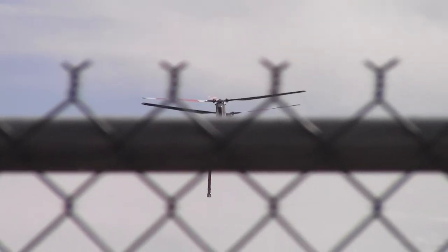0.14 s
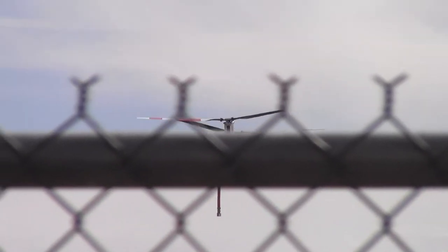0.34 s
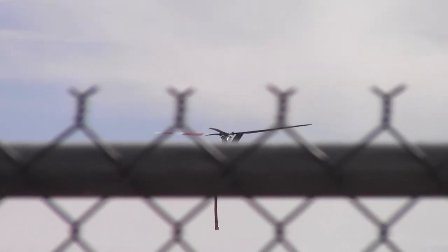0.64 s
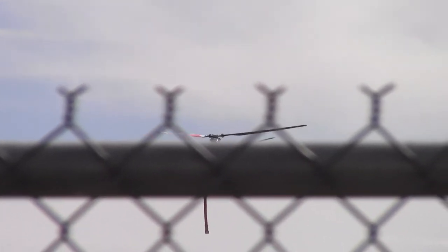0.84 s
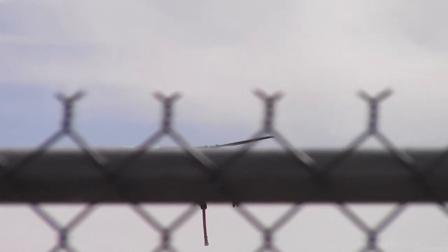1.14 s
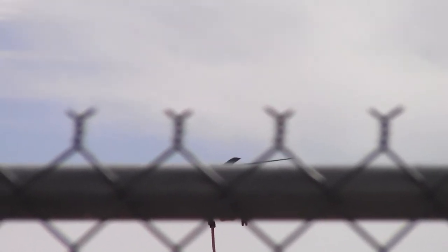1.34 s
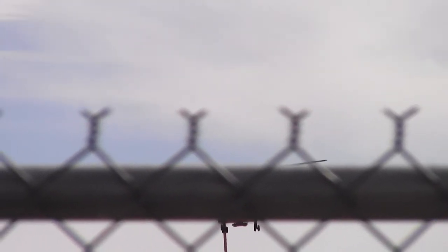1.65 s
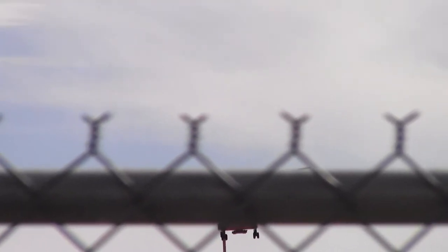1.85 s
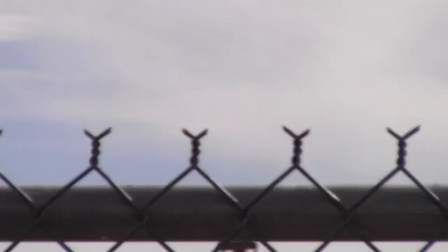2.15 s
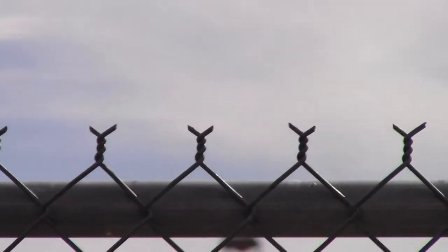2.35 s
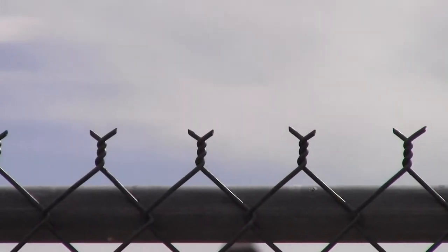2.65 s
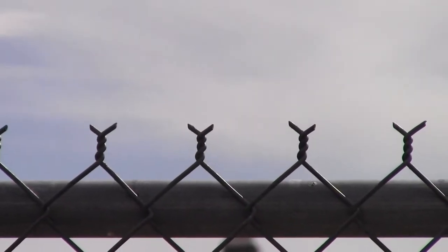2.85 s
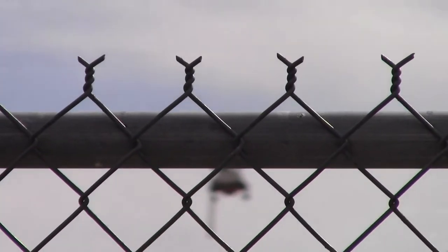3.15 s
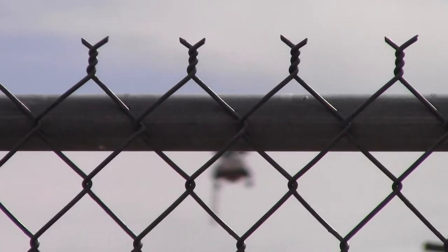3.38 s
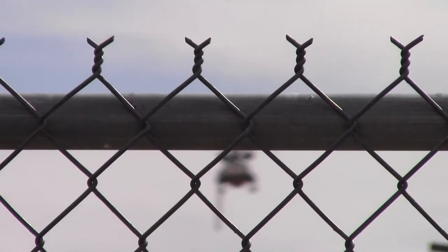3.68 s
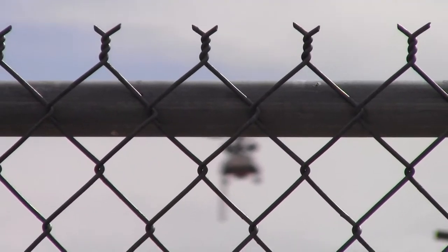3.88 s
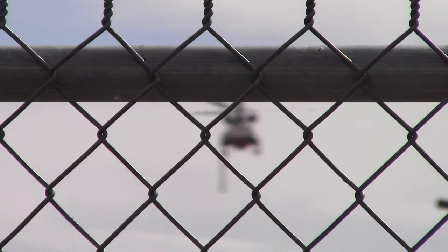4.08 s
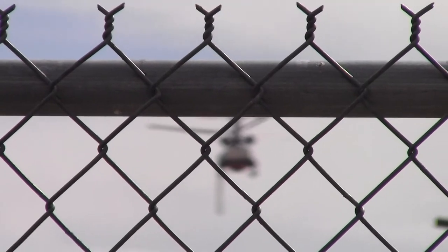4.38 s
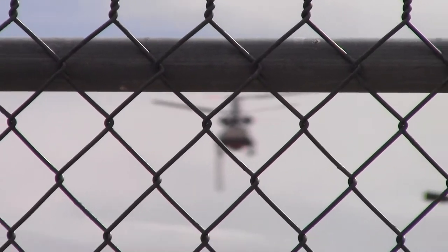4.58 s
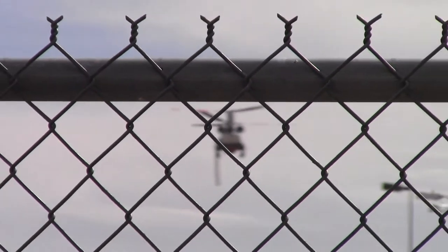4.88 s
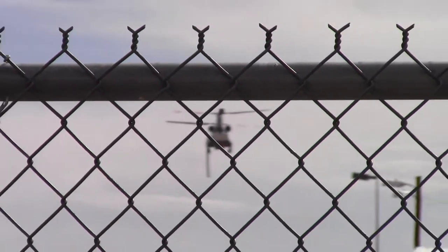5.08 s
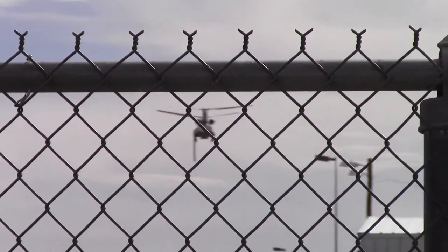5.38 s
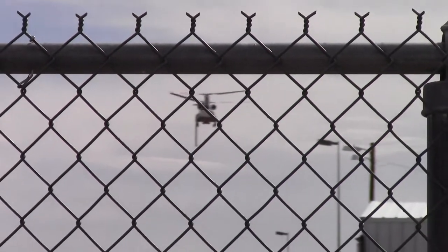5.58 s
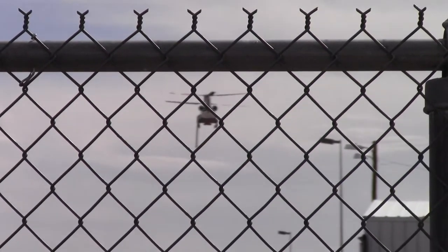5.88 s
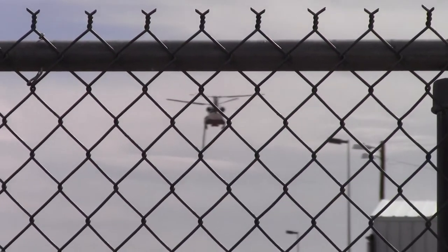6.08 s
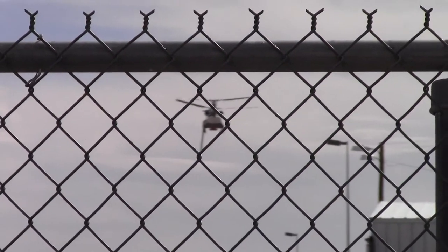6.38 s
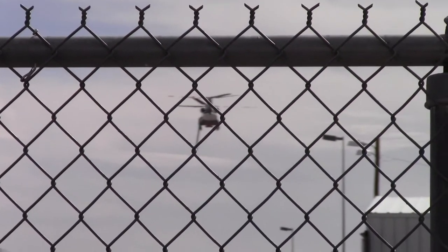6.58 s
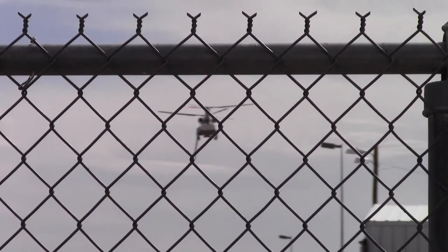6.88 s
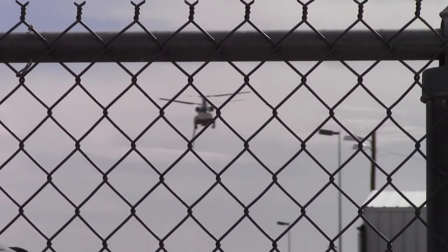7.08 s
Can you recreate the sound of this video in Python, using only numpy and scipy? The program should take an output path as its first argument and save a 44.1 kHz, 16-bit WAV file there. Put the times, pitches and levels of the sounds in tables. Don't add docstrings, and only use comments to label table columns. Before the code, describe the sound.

Distant twin-rotor helicopter hovers with a quick, dull, uneven blade slapping over a low turbine roar; wind puffs and one plastic click come late.

```python
import sys
import numpy as np
from scipy import signal
from scipy.fft import rfft, irfft, next_fast_len
from scipy.io import wavfile
from scipy.ndimage import uniform_filter1d, map_coordinates

SR = 44100
rng = np.random.default_rng(int(sys.argv[2]) if len(sys.argv) > 2 else 0)


def ratio(d):
    e = np.asarray(d, float) / 20
    return 10 ** e


def persist_wave(psi):
    counts = np.round(np.clip(psi, -1, 1) * 32767).astype(np.int16)
    wavfile.write(sys.argv[1], SR, np.atleast_2d(counts).T)


N = 318826

CLEARNESS_SHARE = (0.063, 0.46, 1.1)
OPPOSITE = np.array([[1], [-1]])


def unit(x):
    return x / np.sqrt(np.mean(x ** 2) + 1e-20)


def wobble(rate):
    knots = rng.standard_normal(int(N * rate / SR) + 4)
    return map_coordinates(knots, [np.arange(N) * rate / SR])


def coloured(x, points):
    size = next_fast_len(N + 8192)
    hz, db = np.transpose(points)
    bins_hz = np.fft.rfftfreq(size, 1 / SR)
    gain = ratio(np.interp(np.log(bins_hz + 1), np.log(hz + 1), db))
    return irfft(rfft(x, size) * gain, size)[..., :N]


def noise(points, even=0.):
    x = unit(coloured(rng.standard_normal(N), points))
    power = uniform_filter1d(uniform_filter1d(x * x, size=900), size=900)
    swell = np.abs(power) + 0.38
    return unit(x * swell ** (-np.clip(even, 0, 1) / 2))


def helicopter():
    # (frequency [Hz], level [dB per Hz])
    thud_colour = [(20, -53.5), (60, -27.5), (95, -6), (120, -4.5), (196, 2), (294, -3), (400, -15),
                   (450, -21), (520, -86.5), (900, -140)]
    knock_colour = [(380, -43), (470, -10.5), (540, 1.5), (610, -10), (757, -14), (834, -15), (900, -35),
                    (1000, -69), (1600, -140)]
    crack_colour = [(700, -45.5), (840, 4), (950, 2.5), (1180, -3), (1400, -5), (1600, -9.5), (1800, -30.5),
                    (2300, -32.5), (3000, -70), (4500, -140)]
    knock_bed = [(340, -51), (420, -8), (540, 4), (640, 1.5), (757, -3.5), (850, -7), (950, -30),
                 (1050, -66), (1700, -140)]
    beat = beats()
    thud = slaps(beat, 0, thud_colour, thud_colour, width=0.022, lag=-0.0044)
    knock = slaps(beat, 1, knock_colour, knock_bed, width=0.017, lag=0.0014)
    crack = slaps(beat, 2, crack_colour, crack_colour, width=0.016, lag=0.002)
    thud += shocks(0, thud_colour, level_db=-35, jitter=0.0001, lead=0)
    knock += shocks(1, knock_colour, level_db=-50.5, jitter=0.000067, lead=0.0015)
    crack += shocks(2, crack_colour, level_db=-53, jitter=0.0002, lead=0.0016)
    return orders() + booms() + thud + knock + crack


def slaps(beat, band, colour, bed, width, lag):
    roar_levels = (-26, -37.5, -48)
    t = np.arange(N) / SR
    times, levels = beat
    power = np.zeros(N)
    for s, db in zip(times, levels[:, band]):
        near = slice(max(round((s - 0.08) * SR), 0), round((s + 0.08) * SR))
        distance = np.abs((t[near] - (s + lag)) / width)
        power[near] += ratio(2 * db) * np.exp(-distance ** 2.48)
    flutter = ratio(2.6 * wobble(110) - 2.5)
    burst = np.sqrt(power) * flutter * noise(colour, even=0.65)
    loud, slap, clear = flight(t)
    roar_db = roar_levels[band] + loud - 0.13 * slap + 0.15 * CLEARNESS_SHARE[band] * clear
    roar_db = roar_db + 0.53 * wobble(2.7)
    return burst + ratio(roar_db) * noise(bed, even=0.95)


def shocks(band, colour, level_db, jitter, lead):
    # (time [s], delay [blade passes])
    trailing = [(0, .27), (1, .25), (1.7, .21), (3.6, .205), (5, .185), (7.3, .175)]
    late = np.interp(np.arange(N) / SR, *np.transpose(trailing))
    at = np.flatnonzero(np.diff(np.floor(blade_passes() - late)))
    chance = rng.standard_normal((len(at), 2))
    loud, _, clear = flight(at / SR)
    clear = clear - 5 * np.clip(at / SR - 5.3, 0, 1)
    size_db = loud + CLEARNESS_SHARE[band] * clear + 1.8 * chance[:, 0]
    shift = np.round((jitter * chance[:, 1] - lead) * SR).astype(int)
    train = np.zeros(N)
    train[np.clip(at + shift, 0, N - 1)] = ratio(size_db)
    return ratio(level_db) * unit(coloured(train, colour))


def orders():
    tone_levels = [-54.5, -53.5, -39.5, -42, -43, -65.5, -64, -44.5, -36.5, -46.5, -57, -41]
    passes, out = blade_passes(), np.zeros(N)
    for k, db in enumerate(tone_levels, start=3):
        phase = 2 * np.pi * k * (passes - 0.21) + 0.062 * k * wobble(2.7)
        sway_db = (0.8 + 0.079 * k) * wobble(2.5)
        out += ratio(db + sway_db) * np.cos(phase)
    slap = flight(np.arange(N) / SR)[1]
    return out * ratio(-0.61 * slap)


def booms():
    # (time [s], peak level [dB], pitch [Hz])
    focused = [(0.32, -12.5, 199), (0.689, -16, 208), (0.869, -13.5, 187.4), (1.05, -15.5, 212),
               (1.14, -11.5, 200), (1.776, -8, 201.5), (1.873, -8.5, 219), (1.962, -16, 204),
               (2.681, -11.5, 198), (2.86, -12, 224), (2.945, -14.5, 198), (3.215, -13.5, 221),
               (3.829, -11.5, 218), (4.189, -15, 196.5), (4.367, -14, 207), (4.452, -8, 187),
               (4.546, -11, 191), (5.436, -18.5, 193)]
    half_length_s = 0.0075
    out, t = np.zeros(N), np.arange(-1800, 1800) / SR
    for s, db, hz in focused:
        swell = np.exp(-(t / half_length_s) ** 2)
        start = round(s * SR) - len(t) // 2
        out[start:][:len(t)] -= ratio(db) * swell * np.cos(2 * np.pi * hz * t)
    return out


def beats():
    # (time [s], extra level [dB], treble tilt [dB])
    odd_slaps = [(1.176, 3, -1), (1.447, 0.5, 0.5), (1.611, -0.5, 0.5), (1.789, 1, -1), (2.402, 3.5, -2),
                 (2.771, -3, 4.5), (2.861, -2.5, 3.5), (3.128, -0.5, -2), (3.484, 0, -2.5), (3.84, -2, -1),
                 (4.27, -1, -2), (4.46, -1, -1.5), (4.918, -3, 6), (5.277, -11.5, 10), (5.52, -1, -1.5),
                 (6.058, 4.5, 2.5), (6.684, 2.5, 3), (7.145, 1, -3), (5.61, 0.5, -3.5), (5.7, 0.5, -5),
                 (3.4, -0.5, 2.5), (.98, -1, -2)]
    # (level [dB]), then (share of the slap control [dB per dB])
    slap_levels = (-20, -28, -37.5)
    slap_share = (0.93, 1.1, 0.9)
    centre = -0.021
    scatter_s, scatter_db = 0.0042, 1.1
    at = np.flatnonzero(np.diff(np.floor(blade_passes() - centre))) / SR
    chance = rng.standard_normal((len(at), 4))
    s = at + scatter_s * chance[:, 0]
    extra = scatter_db * chance[:, 1:]
    for when, extra_db, tilt_db in odd_slaps:
        k = np.argmin(np.abs(at - when))
        s[k] = when
        extra[k] = extra_db + tilt_db * np.array(CLEARNESS_SHARE)
    loud, slap, clear = flight(s)
    steered = loud[:, None] + np.outer(slap, slap_share) + np.outer(clear, CLEARNESS_SHARE)
    return s, steered + extra + slap_levels


def blade_passes():
    # (time [s], gain [blade passes])
    range_drift = [(0, -.05), (1, 0), (3, -.03), (4, 0), (4.5, .05), (5.5, .14), (6, .2), (7.3, .2)]
    t = np.arange(N) / SR
    return 11.19 * t + np.interp(t, *np.transpose(range_drift))


def flight(t):
    # (time [s], loudness [dB], slap over roar [dB], clearness of the air [dB])
    flight_path = [(0, 0, -5.5, 1), (0.449, 1, -6, -1.5), (0.898, 0.5, -2.5, -3.5), (1.299, 0, -0.5, -1.5),
                   (1.75, 0.5, 1.5, -3), (2.101, 0.5, 1.5, -3), (2.502, -1, 0, -2.5), (2.849, -1, 3.5, 1.5),
                   (3.2, -0.5, 0, -1), (3.552, -1.5, 2.5, -1), (3.951, -3.5, 2, -1),
                   (4.399, -2.5, 0.5, -4.5), (4.8, -1.5, -8, -0.5), (5.251, -3, -0.5, -6),
                   (5.651, -3.5, -1.5, -2), (6.102, -3.5, -3, -2), (6.6, -3, -5, -2),
                   (7.23, -3, -1.5, -5.5)]
    s, *controls = np.transpose(flight_path)
    return [np.interp(t, s, c) for c in controls]


def lever():
    # (time [s], ring level [dB], snap level [dB])
    contacts = [
        (5.3995, -42.5, -18.5),
        (5.4022, -21, -5),
        (5.4032, 8.5, 4),
        (5.4046, -5.5, -13),
        (5.4098, -10.5, -26.5),
    ]
    # (frequency [Hz], level [dB], time to fall 60 dB [s])
    plastic_modes = [(1380, -14, 0.017), (1860, -4.5, .03), (2160, 1.5, 0.018), (2440, -9.5, 0.018),
                     (2790, -17, .02), (3460, -21, .014), (4400, -36, .012)]
    # (frequency [Hz], level [dB per Hz])
    snap_colour = [(1500, -27.6), (2600, 4.5), (4400, -6), (6000, -11.5), (7600, -14), (10000, -9),
                   (11500, -24.5), (15700, -31)]
    ringing, snap = np.zeros((2, N + SR)), np.zeros(N + SR)
    t = np.arange(SR // 8) / SR
    for s, db, snap_db in contacts:
        start = round(s * SR)
        snap[start:][:len(t)] += ratio(snap_db - 36 - 60 * t / 0.011) * (1 - np.exp(-t / 0.0004))
        for hz, level, t60 in plastic_modes:
            skew = rng.normal(0, 0.11)
            ring = np.sin(2 * np.pi * hz * t + skew * OPPOSITE) * (1 - np.exp(-t / 0.00019))
            ringing[:, start:][:, :len(t)] += ratio(db + level - 24 - 60 * t / t60) * ring
    own = np.array([noise(snap_colour), noise(snap_colour)])
    hiss = noise(snap_colour) + 0.93 * own
    return (ringing[:, :N] + snap[:N] * hiss) * ratio([[-1.1], [1.1]])


def wind():
    # (time [s], level [dB])
    puff_peaks = [(.09, -52), (1.8, -53.5), (1.89, -52), (3.45, -62.5), (4.45, -62.5), (4.7, -66.5),
                  (4.87, -47.5), (5.1, -48), (5.21, -33.5), (5.371, -31.5), (5.49, -30)]
    # (frequency [Hz], level [dB per Hz])
    gust_colour = [(12, -37), (30, -6.5), (60, 3), (100, -10.5), (160, -35), (300, -87.5), (600, -140)]
    eddy_colour = [(15, -29.5), (40, -12.5), (90, -0.5), (150, -3.5), (250, -6.5), (400, -19.5), (800, -57),
                   (2000, -140)]
    s, puff_db = np.transpose(puff_peaks)[:, :, None]
    apart = np.abs(np.arange(N) / SR - s)
    push_db = -44 + 0.4 * (puff_db + 43.5) - 120 * apart
    push = ratio(-51) + ratio(push_db.max(axis=0))
    swirl = ratio(-79.5) + ratio((puff_db - 300 * apart).max(axis=0))
    return push * noise(gust_colour, even=0.4) + swirl * noise(eddy_colour, even=0.6) * OPPOSITE


def air():
    # (frequency [Hz], level [dB per Hz])
    hiss_colour = [(900, -25.5), (1700, 3), (2500, -6), (3200, -11), (5000, -16), (8000, -21.6),
                   (11000, -26.1), (15700, -30.5)]
    wide_colour = [(150, -61.5), (300, -8.5), (449, 0.5), (700, -2.1), (1000, -8.5), (3340, -16.5),
                   (5000, -21.6), (8000, -26), (15700, -36.5)]
    return ratio(-62) * noise(hiss_colour) + ratio(-61) * noise(wide_colour) * OPPOSITE


def scene():
    return helicopter() + lever() + wind() + air()


def low_pass(x):
    return signal.sosfilt(signal.butter(12, 15720, fs=SR, output="sos"), x)


def record(dry):
    # (frequency [Hz], gain [dB])
    mild_cut = [(25, -14), (50, -9), (85, -7), (115, -1), (200, -1)]
    hard_cut = [(25, -22), (60, -26), (90, -16.5), (120, -14.5), (200, -8.5), (300, -3.5), (450, -1)]
    # (frequency [Hz], gain [dB])
    side_cut = [(700, -34.5), (1100, -17), (1500, -2)]
    opens, closes = 4.648, 5.657
    t = np.arange(N) / SR
    opened = np.clip((t - opens) / 0.004, 0, 1)
    closed = np.clip((t - closes) / 0.004, 0, 1)
    side = coloured((dry[0] - dry[1]) / 2, side_cut)
    narrow = dry.mean(axis=0) + side * OPPOSITE
    x = (1 - opened) * coloured(dry, mild_cut)
    x = x + (opened - closed) * dry
    x = x + closed * coloured(narrow, hard_cut)
    x = x + ratio(-50) * opened * np.exp(-np.abs(t - opens) / 0.12)
    x = x - ratio(-51) * closed * np.exp(-np.abs(t - closes) / 0.25)
    x = x * np.clip(np.minimum(t, t[::-1]) / 0.004, 0, 1)
    return low_pass(x)


dry = scene()
out = record(dry)
persist_wave(out)
```